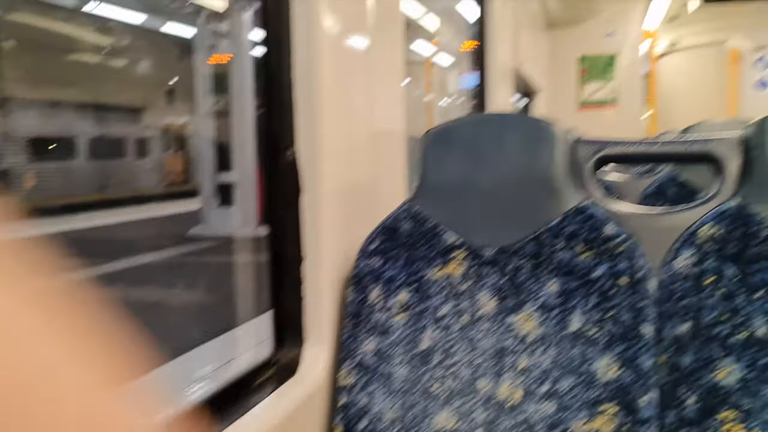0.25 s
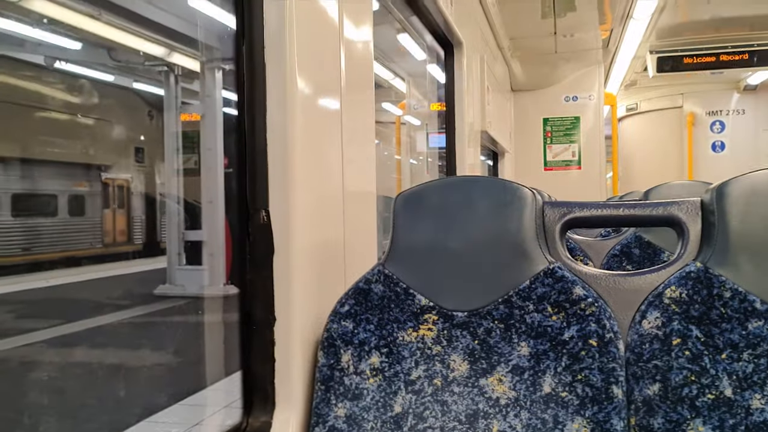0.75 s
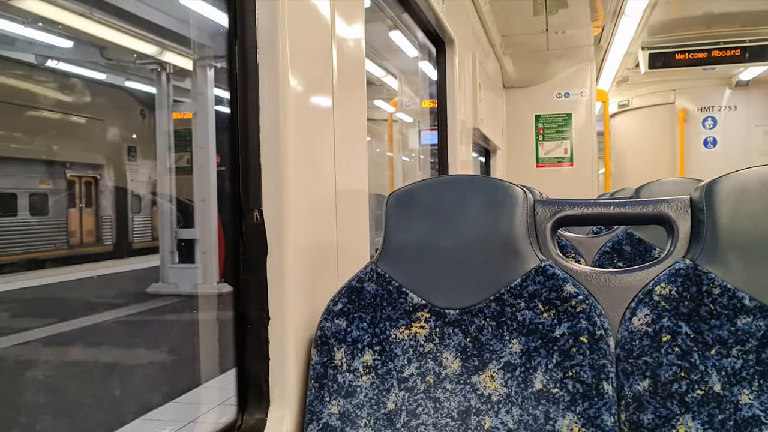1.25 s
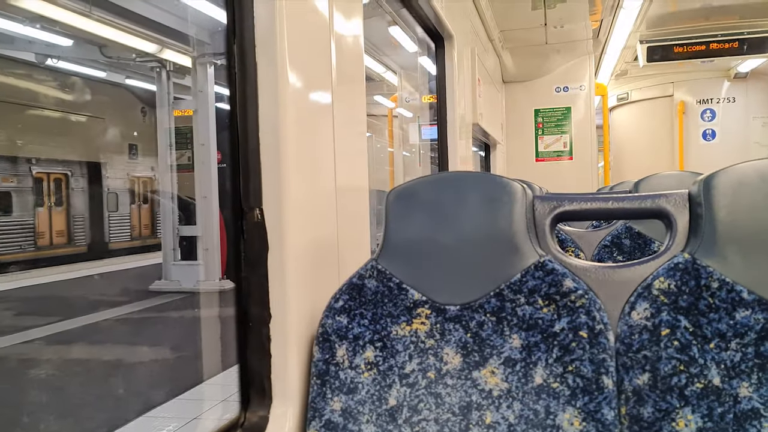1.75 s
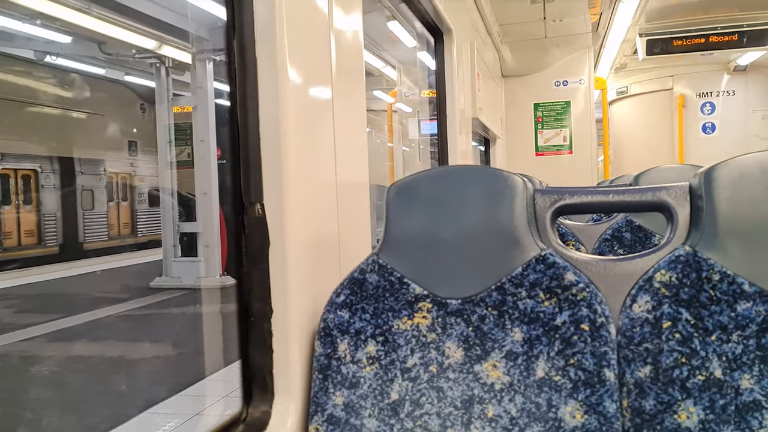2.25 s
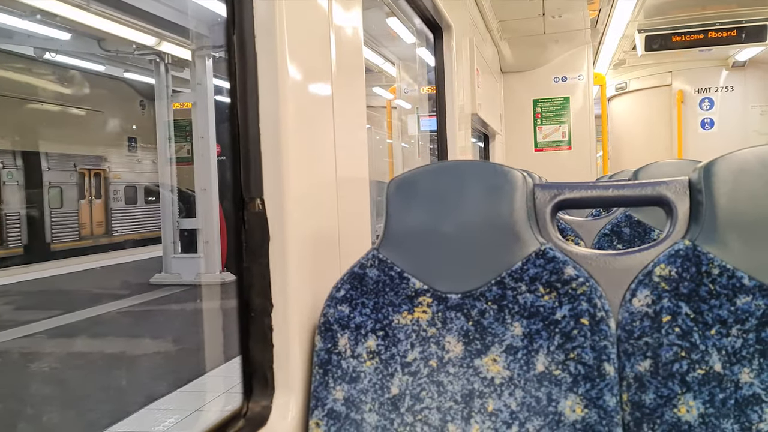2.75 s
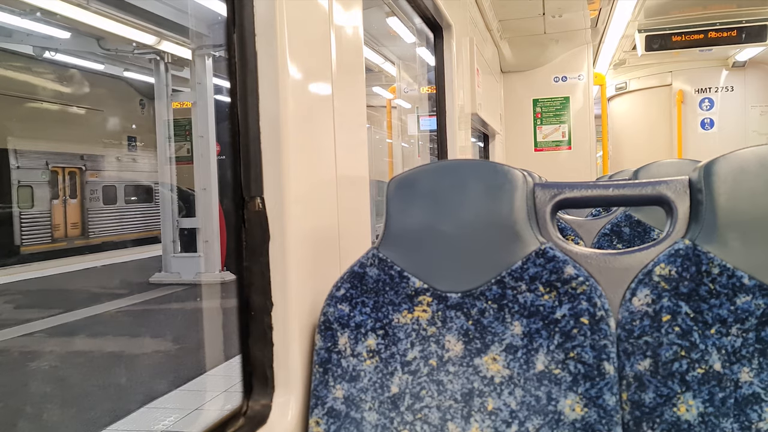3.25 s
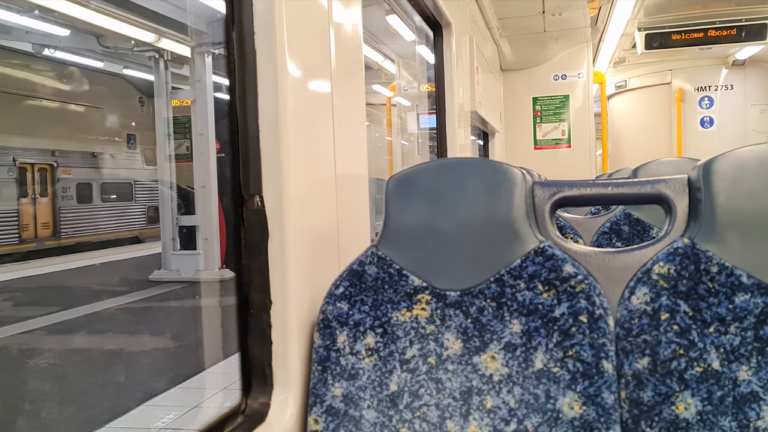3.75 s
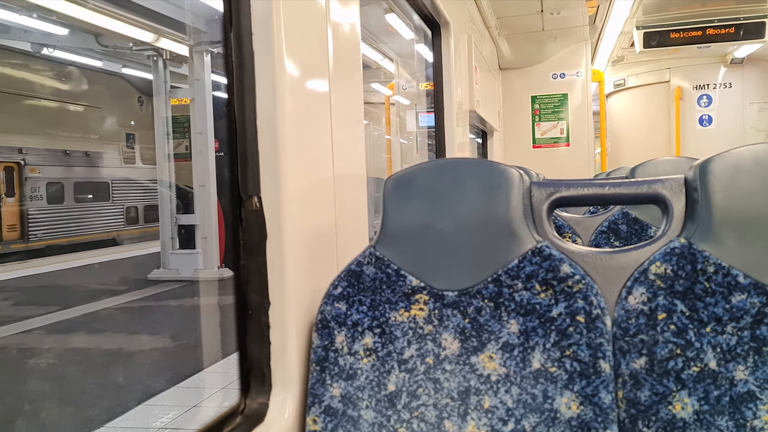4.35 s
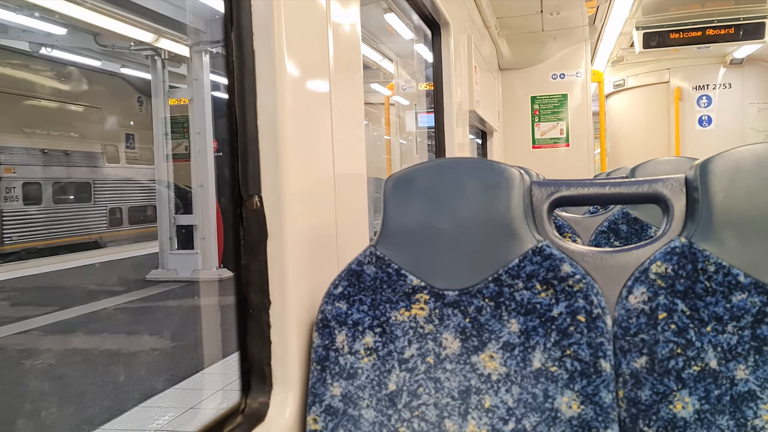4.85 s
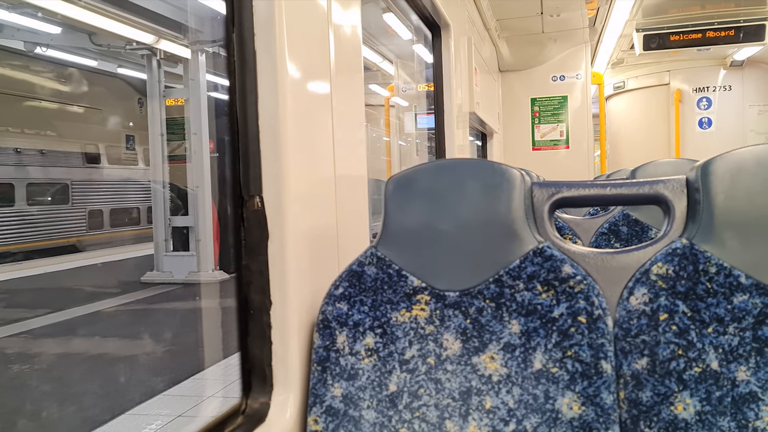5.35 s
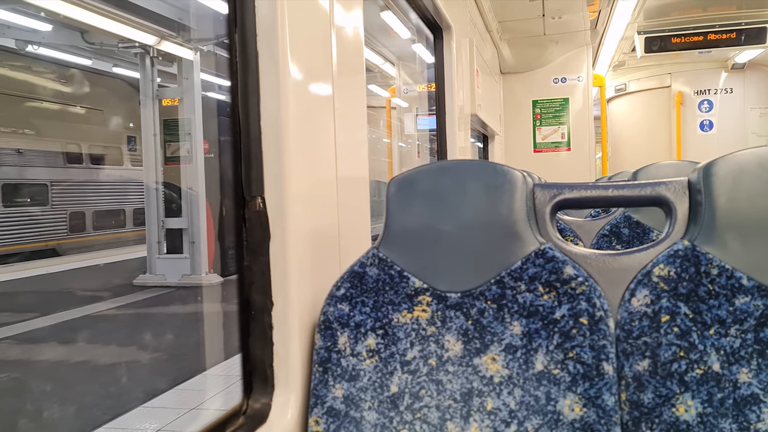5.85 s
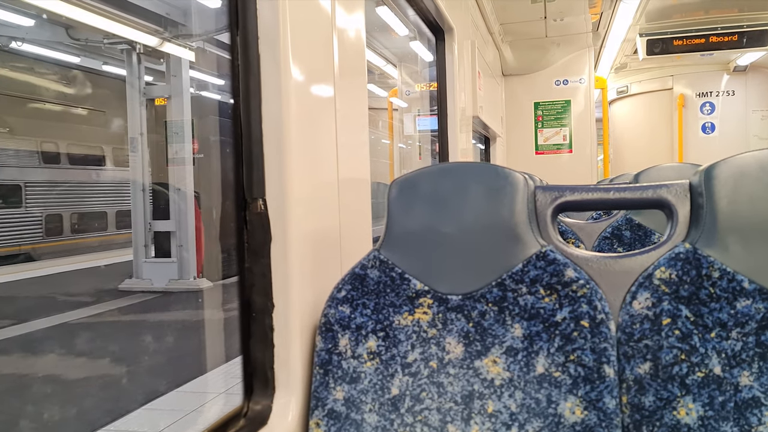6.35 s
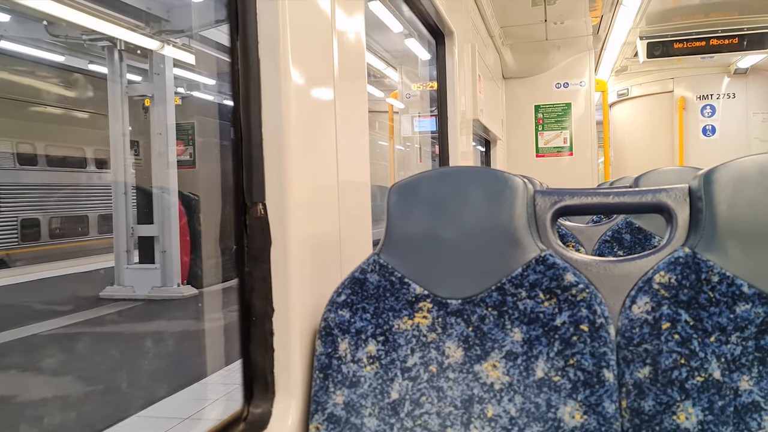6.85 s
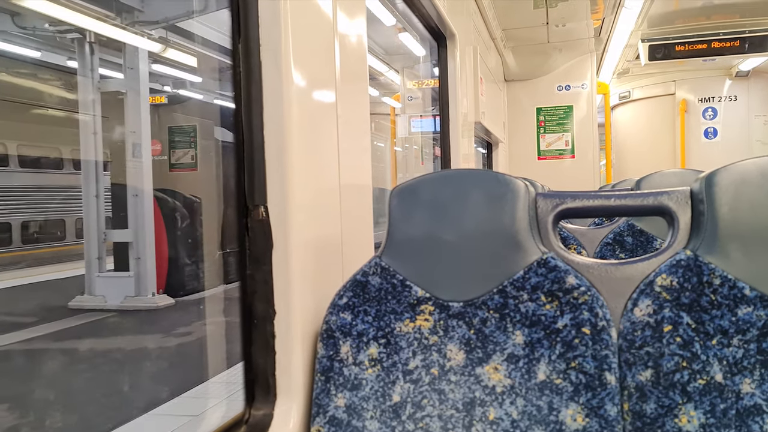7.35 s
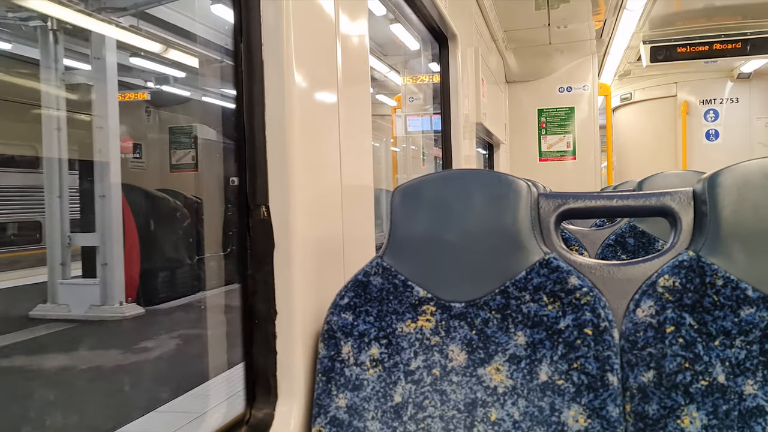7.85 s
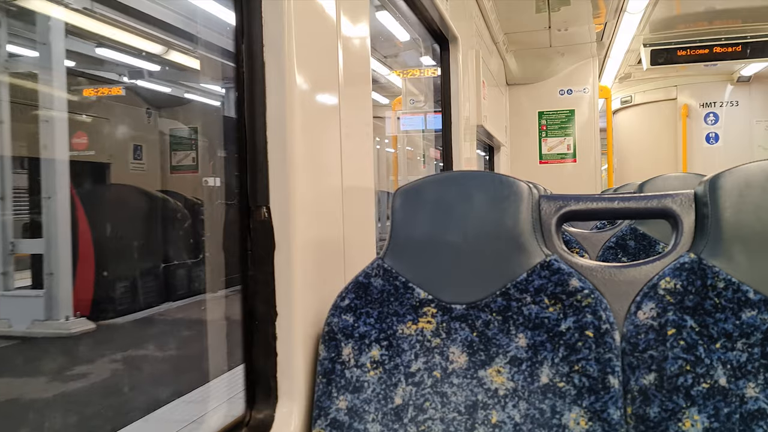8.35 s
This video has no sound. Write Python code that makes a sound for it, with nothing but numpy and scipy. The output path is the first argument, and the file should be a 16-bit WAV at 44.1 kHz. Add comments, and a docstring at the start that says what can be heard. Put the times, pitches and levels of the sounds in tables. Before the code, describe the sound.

Inside a railcar, a diesel lopes at idle while a hand fumbles the phone, then revs to a steady drone, ending with an air puff.

```python
"""A six-cylinder diesel under a railcar's floor lopes at idle, then runs up to a drone as the car leaves a station.
The drone is a stack of waves at multiples of the engine cycle; rattle, gear whine and coloured noise follow it.
The transmission whines as it takes up the drive, a belt chirps at its own rate, and wheels scrub and sing on rails.
Near the start a hand rubs and taps the phone; later the trim creaks, surfaces squeak and an air valve puffs.
Ventilation tones hum throughout. Noise bands shaped by tables make the rumble, clatter, scrubs and puff."""
import sys
import numpy as np
from scipy import signal
from scipy.fft import rfft, irfft
from scipy.io import wavfile
from scipy.ndimage import uniform_filter1d

SR = 44100
rng = np.random.default_rng(int(sys.argv[2]) if len(sys.argv) > 2 else 0)


def persist_wave(psi):
    """Save psi, clipped to +-1, as 16-bit WAV."""
    counts = np.round(np.clip(psi, -1, 1) * 32767).astype(np.int16)
    wavfile.write(sys.argv[1], SR, np.atleast_2d(counts).T)


N = 378378
TIME = np.arange(N) / SR  # seconds


def undb(db):
    """Turns decibels into a gain."""
    return 10 ** (np.asarray(db) / 20)


def ramp(start_s, length_s):
    """Rises evenly from 0 to 1, then holds."""
    return np.clip((TIME - start_s) / length_s, 0, 1)


def bumps(table):
    """Smooth passing rises or dips of a level, in dB."""
    return sum(change_db * np.exp(-((TIME - s) / half_s) ** 2) for s, half_s, change_db in table)


def swell(peak_s, rise_s, t60_s, db):
    """An envelope that swells to its peak, then dies away by 60 dB in t60_s."""
    age = TIME - peak_s
    rising = -(age / rise_s) ** 2
    fading = -np.log(1000) * age / t60_s
    return undb(db) * np.exp(np.where(age < 0, rising, fading))


def walk(rate):
    """A random wavering: a new level every 1 / rate seconds, smoothed twice and scaled to a spread of 1."""
    hold = int(SR / rate)
    steps = np.repeat(rng.standard_normal(N // hold + 2), hold)
    smooth = uniform_filter1d(uniform_filter1d(steps, hold), hold)[:N]
    return smooth / smooth.std()


def tone(cycles, waver_rate):
    """A sustained whine whose level and phase waver at random."""
    level = 1 + .3 * walk(waver_rate + 3)
    return np.sqrt(2) * level * np.cos(2 * np.pi * cycles + .7 * walk(waver_rate))


def line(cycles, waver_rate):
    """A narrow band of noise round a moving pitch; a faster waver makes it wider and rougher."""
    angle = 2 * np.pi * cycles
    return walk(waver_rate) * np.cos(angle) + walk(waver_rate) * np.sin(angle)


def over_bins(points):
    """Spreads a table over all frequencies, joining its points on a log-frequency axis."""
    hz, value = np.transpose(points)
    bin_hz = np.arange(N // 2 + 1) * SR / N
    return np.interp(np.log(bin_hz + 1), np.log(hz), value)


# How alike left and right are. Each row: frequency in Hz, correlation (1 is identical, 0 unrelated).
LIKENESS = [(60, 1), (125, 0.88), (250, 0.5), (500, 0.78), (1000, -0.14), (2000, -0.13), (16000, 0.096)]


def diffuse(spectrum):
    """Coloured noise filling the carriage, scaled to a level of 1: bass alike on both sides, treble mostly not."""
    alike = np.clip(over_bins(LIKENESS), -1, 1)
    noise = rfft(rng.standard_normal((2, N))) * undb(over_bins(spectrum))
    mid, side = noise * np.sqrt([1 + alike, 1 - alike])
    stereo = irfft(np.array([mid + side, mid - side]), N)
    return stereo / stereo.std()


# When the engine starts to run up, and for how long, in seconds
RUN_UP_S, RUN_UP_LENGTH_S = 3.75, 1.3


def engine_speed(idle_hz=42.51, full_hz=62.5):
    """Firings per second: idle, then a run-up that eases into the governed speed."""
    return idle_hz + (full_hz - idle_hz) * np.sin(np.pi / 2 * ramp(RUN_UP_S, RUN_UP_LENGTH_S))


# Brief dips of the boom. Each row: centre in seconds, half length in seconds, change in dB.
BOOM_DIPS = [(4.53, 0.075, -9), (4.76, 0.14, -3), (5.22, 0.098, -10)]


def boom(firing_hz, throttle, floor_hz=55.76, width_hz=10.9, idle_db=-31.5, open_db=-15):
    """The floor's boom grows with the throttle and responds most as the firing rate crosses its resonance."""
    response = 1 / np.hypot(1, 2 * (firing_hz - floor_hz) / width_hz)
    return response * undb(idle_db + (open_db - idle_db) * throttle + bumps(BOOM_DIPS))


# Lines of the drone, idling and under load. Each row: multiple of the engine cycle,
# level in dB relative to the drone's level below. The boom takes the place of row 6.
IDLE_ORDERS = [(1, -42), (2, -39), (3, -31), (4, -23.5), (5, -17.5), (6, -14), (7, -17), (8, -7.5),
               (9, 1.5), (10, -1.8), (11, -10), (12, -10), (13, -14), (14, -23), (15, -18), (16, -20),
               (17, -17), (18, -17), (19, -22), (20, -19), (21, -21), (22, -27), (23, -27), (24, -18),
               (25, -28), (26, -30), (27, -27), (28, -24), (30, -29), (32, -30), (34, -28), (36, -29),
               (38, -26), (40, -28), (42, -29), (44, -30)]
LOAD_ORDERS = [(1, -47), (2, -36), (3, -16), (4, -28), (5, -10), (6, 0), (7, -18), (8, -18), (9, -19),
               (10, -27), (11, -25), (12, -11.5), (13, -26), (14, -17), (15, -26), (16, -24), (17, -31),
               (18, -16), (19, -33), (20, -28), (21, -38), (22, -41), (23, -35), (24, -28), (25, -39),
               (26, -39), (27, -32), (28, -29), (29, -39), (30, -28), (31, -40), (32, -33), (33, -33),
               (34, -36), (35, -38), (36, -33), (37, -37), (38, -35), (39, -38), (40, -37), (41, -39),
               (42, -31), (43, -39), (44, -43)]
# The idle lope slackens or thumps harder. Each row: centre in seconds, half length in seconds, change in dB.
LOPE_CHANGES = [(.38, .06, 2), (.51, .06, -5), (1.22, .08, -5.5), (1.78, .15, -4.5), (2.06, .05, 2),
                (2.52, .22, -3), (2.9, .05, 2), (3.68, .25, -6.5)]


def drone(firing_hz, turn, load, lump=.55, sway_rate=4, firing_sway=0.032, port_phase=0.099):
    """Unequal cylinders give a line at every multiple of the cycle; the sixth is the firing rate."""
    idle_db, load_db = -25.8, -18.7
    idle, loaded = dict(IDLE_ORDERS), dict(LOAD_ORDERS)
    throttle = ramp(3.88, 0.24)  # opens at 3.88 s, over 0.24 s
    fuelling = ramp(RUN_UP_S, .42)  # two firing harmonics build up over 0.42 s
    lope = undb(bumps(LOPE_CHANGES))
    wobble = (1 - load) * .08 + load * .05
    angle = 2 * np.pi * (turn - lump)
    ports = np.array([[port_phase], [-port_phase]])  # standing waves meet the two sides slightly apart
    firing_level = boom(firing_hz, throttle) * (1 + firing_sway * walk(sway_rate))
    out = firing_level * np.cos(6 * angle + ports)
    for k in loaded:
        if k == 6:
            continue
        # these firing harmonics build up sooner; the other lines grow with engine speed
        drive = fuelling if k in (12, 18) else load
        idling = (1 - load) * (lope if 6 < k < 12 else 1)
        idle_part = idling * undb(idle_db + idle.get(k, -np.inf))
        gain = idle_part + drive * undb(load_db + loaded[k])
        # the strong lines near the boom are timed to one point of the cycle; the body scatters the others
        scatter = rng.uniform(0, 2 * np.pi) * (k < 5 or k > 12)
        # the floor rings round its resonance, which draws each idle thump out
        ringing = .4 * (1 - load) * (k - 9.5) ** 2 * (6 < k < 12)
        phase = k * angle + scatter + ringing + wobble * walk(sway_rate)
        out = out + gain * (1 + wobble * walk(sway_rate)) * np.cos(phase + ports)
    return np.sqrt(2) * out


# Colours of the noise: body rumble and clatter, each idling and loaded, and hiss.
# Each row: frequency in Hz, relative strength in dB per Hz.
RUMBLE = [(20, -15.5), (35, -9), (60, 1.5), (78, 3), (105, -11), (135, -11), (200, -15), (260, -13),
          (300, -13.5), (335, -10), (385, -12.5), (430, -18), (560, -18), (800, -31.5), (1500, -75.5)]
RUMBLE_LOADED = [(20, -18), (42, -14), (58, -4), (76, 5.5), (100, -5.5), (135, -4), (190, -16), (260, -17),
                 (340, -13.5), (420, -16.5), (560, -18.5), (800, -29), (1500, -75)]
CLATTER = [(250, -22), (500, -13), (780, 0), (1100, -6.5), (1400, -6), (1750, -6.5), (2100, -14.5),
           (2600, -16.5), (3200, -18.5), (3700, -28), (4500, -35), (7000, -69)]
CLATTER_LOADED = [(250, -22), (480, -15), (660, -4), (790, -1), (930, -3), (1120, -7.5), (1320, -5),
                  (1560, -8.5), (1730, -3.5), (1870, -11.5), (2150, -14.5), (2600, -16), (3100, -16.5),
                  (3700, -27), (4500, -37.5), (7000, -67)]
HISS = [(2000, -15), (3800, -2), (4800, -3.5), (5700, -5), (6800, -22.5), (9000, -15), (11000, -21.5),
        (16000, -35.5)]
# Moments of louder clatter and hiss. Each row: centre in seconds, half length in seconds, rise in dB.
CLATTER_SWELLS = [(3.9, 0.18, 2), (4.75, 0.38, 2.5)]
HISS_SWELLS = [(1.9, 1, 7), (4.85, 0.34, 3), (6.65, 0.2, 5)]


def machinery(turn, load, knock=0.071, flicker_db=0.79):
    """The body rumbles; combustion clatter through the floor pulses at each firing, with a little hiss above."""
    firing = np.cos(2 * np.pi * 6 * turn)
    pulsing = (1 + knock * firing) * undb(flicker_db * walk(18))
    idling, pulling = np.sqrt(1 - load), np.sqrt(load)
    rumble = idling * diffuse(RUMBLE) * undb(-32.5)
    rumble = rumble + pulling * diffuse(RUMBLE_LOADED) * undb(-31.8)
    clatter = idling * diffuse(CLATTER) * undb(-43)
    clatter = clatter + pulling * diffuse(CLATTER_LOADED) * undb(-41.5)
    hiss = diffuse(HISS) * undb(-72 + 4 * load + bumps(HISS_SWELLS))
    return rumble + pulsing * clatter * undb(bumps(CLATTER_SWELLS)) + hiss


def valve_train(turn, load, load_db=-47, idle_db=-50, tilt=1.6, size=4096):
    """Tappets and injectors repeat the same rattle every cycle: a dense comb of faint lines."""
    k = np.arange(size // 2 + 1)  # multiple of the engine cycle
    comb = np.where((k > 44) & (k < 170), np.maximum(k, 1.) ** -tilt, 0)
    cycle = irfft(rfft(rng.standard_normal((2, size))) * comb)
    cycle = cycle / cycle.std()
    place = np.arange(size) / size
    rattle = np.array([np.interp(turn, place, side, period=1) for side in cycle])
    return rattle * (load * undb(load_db) + (1 - load) * undb(idle_db))


# Gear lines. Each row: multiple of the engine cycle, level in dB at full load,
# waver rate in steps per second.
GEARS = [(46, -53, 1.5), (57.9, -57, 3), (70.8, -56.5, 3), (78, -58.5, 2), (81.15, -53, 1.5),
         (98.8, -61, 4), (125.6, -62, 3), (141.2, -65, 3), (156.5, -65, 8), (160.2, -63, 5),
         (164.9, -58.5, 7), (166, -61.5, 6), (168, -61, 14), (240, -70, 5), (281.3, -70, 8),
         (308, -71.5, 3), (324, -77, 5), (343.7, -76, 5)]


def gears(turn, load, idle_share=0.072):
    """Gear lines follow the engine and sing out as it nears full speed."""
    whine = [sum(undb(db) * tone(k * turn, rate) for k, db, rate in GEARS) for _ in range(2)]
    return np.array(whine) * (idle_share + (1 - idle_share) * load ** 4)


# Path of the torque converter's whine. Each row: time in seconds, pitch in Hz, level in dB.
CONVERTER = [(4, 1800, -110), (4.7, 1890, -69), (5.35, 1920, -58.5), (6, 1870, -63), (6.7, 1867, -60.5),
             (7.4, 1874, -68.5), (8.5, 1790, -65)]


def converter(waver_rate=5):
    """The transmission whines as it takes up the drive; its set pitch path climbs, then sinks as slip falls."""
    s, hz, db = np.transpose(CONVERTER)
    cycles = np.cumsum(np.interp(TIME, s, hz)) / SR
    return undb(np.interp(TIME, s, db)) * np.array([tone(cycles, waver_rate) for _ in range(2)])


# The belt slips harder. Each row: centre in seconds, half length in seconds, rise in dB.
BELT_SLIPS = [(.33, 0.42, 23), (4.8, .6, 8.5), (5.55, 0.4, 2.5)]


def belt(sharpness=1.1, slack_waver_rate=300, taut_waver_rate=700, bend_hz=50):
    """An auxiliary belt slips once a turn, chirping upward; pulled taut, it is higher, louder and rougher."""
    slack_hz, taut_hz = 9300, 10120
    slack_db, taut_db = -79.5, -65.5
    slack_rate, taut_rate = 10.47, 10.37  # belt turns per second
    chirp_s = 5.994  # a moment at which it chirps
    taut = ramp(5.12, 0.21)  # pulls taut from 5.12 s, over 0.21 s
    hz = slack_hz + (taut_hz - slack_hz) * taut
    db = slack_db + (taut_db - slack_db) * taut + bumps(BELT_SLIPS)
    turn = np.cumsum(slack_rate + (taut_rate - slack_rate) * taut) / SR
    angle = 2 * np.pi * (turn - np.interp(chirp_s, TIME, turn))
    cycles = np.cumsum(hz + bend_hz * np.sin(angle) + 30 * walk(11)) / SR
    gate = np.exp(sharpness * (np.cos(angle) - 1))

    def squeal():
        return (1 - taut) * line(cycles, slack_waver_rate) + taut * line(cycles, taut_waver_rate)
    return gate * undb(db) * np.array([squeal() for _ in range(2)])


# Wheels singing. Each row: peak in seconds, swell in seconds, fade by 60 dB in seconds, pitch in Hz, level in dB.
SINGING = [(3.88, .1, .6, 3480, -70), (4.6, .12, 1.6, 3205, -60.5), (4.98, .2, 1.1, 3203, -58.5),
           (4.98, .12, 1, 2993, -63), (5.22, .1, .6, 3510, -67), (5.2, .17, 2.4, 2512, -59.5),
           (6.1, .15, 1, 3208, -63)]
# Wheels scrubbing. Each row: peak in seconds, swell in seconds, fade by 60 dB in seconds, level in dB.
SCRUBS = [(3.92, .12, .8, -66), (4.6, .13, .9, -58), (4.96, .06, 1.1, -50), (6.06, .13, 1, -54.5)]
# Colour of the scrub. Each row: frequency in Hz, relative strength in dB per Hz.
SCRUB = [(1500, -22), (2400, -1.5), (3200, 5), (3700, -12.5), (4050, -9), (4600, -20), (7000, -40.5)]


def wheels(waver_rate=7):
    """Wheels scrub on the rails as the car starts to roll, and their modes ring up faintly."""
    def sing():
        return sum(swell(s, rise, t60, db) * tone(hz * TIME, waver_rate) for s, rise, t60, hz, db in SINGING)
    ring = np.array([sing() for _ in range(2)])
    return ring + sum(swell(*row) for row in SCRUBS) * diffuse(SCRUB)


# Rubs on the phone. Each row: peak in seconds, swell in seconds, fade by 60 dB in seconds,
# level of the dull part in dB, level of the bright part in dB (both before the grain and the pan).
RUBS = [(0.012, 0.04, 0.33, -25, -40), (.09, 0.045, 0.23, -41, -62), (.155, 0.041, 0.11, -42, -46.5),
        (.27, 0.029, 0.26, -62, -56), (.385, 0.032, 0.25, -56, -50), (0.432, 0.03, 0.06, -34.5, -45),
        (.572, 0.013, 0.11, -47, -47.5), (0.598, 0.013, 0.018, -58, -46.5)]
# Dull and bright colours of a rub. Each row: frequency in Hz, relative strength in dB per Hz.
RUB_LOW = [(100, 5.5), (400, -1), (850, -2), (1300, -4), (2500, -13.5), (4000, -22.5), (5700, -23),
           (7200, -48)]
RUB_HIGH = [(1000, -6), (3000, 4.5), (5500, -8), (7500, -14), (10000, -12), (16000, -23)]
# Finger taps on the case. Each row: start in seconds, pitch in Hz,
# width in Hz (wider is shorter), peak of the envelope in dB.
TAPS = [(0.253, 4460, 4000, -35), (.282, 4700, 500, -47), (.318, 3000, 2000, -42), (.422, 2700, 1500, -29),
        (.429, 2000, 1900, -26), (.5535, 4000, 3000, -41), (0.5995, 760, 420, -17),
        (0.5995, 2100, 2600, -24.5), (.6645, 2750, 1500, -31.5), (.703, 8000, 7000, -48),
        (1.0445, 2100, 1150, -24)]


def hand(pan_db=-5, bump_s=0.0453, bump_hz=38, bump_db=-12):
    """Skin drags grainily over the case, the grip bumps it, and fingertips tap it."""
    low = sum(swell(s, rise, t60, db) for s, rise, t60, db, _ in RUBS)
    high = sum(swell(s, rise, t60, db) for s, rise, t60, _, db in RUBS)
    skin_grain = undb(2.2 * walk(450))
    rubs = (low * diffuse(RUB_LOW) + high * diffuse(RUB_HIGH)) * skin_grain
    bump = swell(bump_s, 0.024, 0.13, bump_db) * np.cos(2 * np.pi * bump_hz * (TIME - bump_s))
    taps = 0
    for s, hz, width_hz, db in TAPS:
        age = np.maximum(TIME - s, 0)
        push = np.pi * width_hz * age  # a soft fingertip rounds the attack
        taps = taps + undb(db) * push * np.exp(1 - push) * np.sin(2 * np.pi * hz * age)
    pan = undb(np.array([[pan_db], [-pan_db]]) / 2)
    return (rubs + bump) * pan + taps


# Colours of the air jet and of its ring in the carriage.
# Each row: frequency in Hz, relative strength in dB per Hz.
JET_COLOUR = [(500, -9), (2000, -3), (3200, -3.5), (4000, 6), (4650, 6), (5200, -4.5), (6000, -7),
              (6900, -15), (7500, -9.5), (8300, -9.5), (9000, -.5), (9700, -5), (11000, -4.5), (12000, -.5),
              (13000, -4), (16000, -5)]
RING_COLOUR = [(200, -14), (420, -1), (740, 7.5), (1100, 0), (2000, -4.5), (2500, -4), (3200, -8),
               (4000, -1), (4700, -1.5), (5400, -11.5), (6000, -14.5), (6900, -23), (9100, -12),
               (10500, -19), (12200, -18), (13000, -25), (16000, -35)]


def valve(open_s=8.365, pan_db=-2, jet_db=-28.5, jet_t60=0.27, jet_hold_s=0.015, ring_db=-23, ring_t60=0.48):
    """A bright jet of compressed air bursts out and holds an instant; its duller body lingers in the carriage."""
    burst = swell(open_s, 0.0027, jet_t60, jet_db)
    hold = swell(open_s + jet_hold_s, 0.008, jet_t60, jet_db)
    jet = np.maximum(burst, hold) * diffuse(JET_COLOUR)
    ring = swell(open_s + 0.024, 0.027, ring_t60, ring_db) * diffuse(RING_COLOUR)
    return (jet + ring) * undb(np.array([[pan_db], [-pan_db]]) / 2)


# Trim creaks. Each row: peak in seconds, swell in seconds, fade by 60 dB in seconds, level in dB.
CREAKS = [(2.18, .015, 0.34, -55), (2.845, 0.016, 0.43, -47.5), (4.058, 0.005, 0.17, -48),
          (4.114, .005, 0.2, -55), (5.06, .02, .4, -59), (5.092, 0.005, 0.1, -49.5),
          (8.09, 0.022, 0.32, -57), (8.18, .015, 0.23, -56)]
# Colour of a creak. Each row: frequency in Hz, relative strength in dB per Hz.
CREAK = [(1200, -21), (2800, 5), (4500, 1), (5800, -4), (7200, -14), (9500, -11), (12000, -21.5),
         (16000, -24.5)]


def trim(grain_db=1.0):
    """Panels give short gritty creaks that fade in the carriage."""
    return sum(swell(*row) for row in CREAKS) * diffuse(CREAK) * undb(grain_db * walk(250))


# Spells of faint squeaking. Each row: start in seconds, length in seconds, lowest pitch in Hz,
# highest pitch in Hz, squeaks per second, average peak of one squeak in dB before it is shared between the sides.
SQUEAKS = [(4.6, .55, 3750, 4250, 350, -74), (4.58, .55, 4400, 6000, 700, -82),
           (5.18, .3, 8900, 9500, 120, -74), (5.2, .45, 10300, 10700, 120, -73),
           (6.4, .38, 10800, 13400, 110, -79), (6.4, .42, 4000, 6000, 700, -81)]


def squeaks(squeak_s=.04, most_slide=.02):
    """Rubbing surfaces stick and slip in clusters of tiny sliding whistles."""
    out = np.zeros((2, N))
    size = int(squeak_s * SR)
    along = np.linspace(-1, 1, size)
    for s, length, low, high, rate, db in SQUEAKS:
        for when, pitch, slide, strength, side in rng.random((int(rate * length), 5)):
            hz = (low + (high - low) * pitch) * (1 + most_slide * (slide - .5) * along)
            level = undb(db) * 2 * strength
            whistle = level * np.hanning(size) * np.sin(2 * np.pi * np.cumsum(hz) / SR)
            start = int((s + when * length) * SR) - size // 2
            out[:, start:start + size] += np.sqrt([[side], [1 - side]]) * whistle
    return out


# Ventilation tones. Each row: pitch in Hz, level in dB.
FANS = [(246, -54), (312.2, -51), (495.3, -60), (742.9, -55), (990, -54.5), (1190, -67.5), (1976, -73)]


def fans(drift=0.094):
    """Steady fan tones that waver separately at each side."""
    def hum(hz, db):
        level = undb(db) * (1 + .17 * walk(3.5))
        return np.sqrt(2) * level * np.cos(2 * np.pi * hz * TIME + drift * walk(2.9))
    return np.array([sum(hum(hz, db) for hz, db in FANS) for _ in range(2)])


def scene():
    """Engine speed sets the cycle and the load, which drive the engine and gears; the rest keeps its own time."""
    firing_hz = engine_speed()
    turn = np.cumsum(firing_hz) / SR / 6  # engine cycles so far, six firings in each
    load = np.clip((firing_hz - 43) / 16.4, 0, 1)
    engine = drone(firing_hz, turn, load) + machinery(turn, load) + valve_train(turn, load)
    drive = gears(turn, load) + converter() + belt()
    passing = wheels() + hand() + valve() + trim() + squeaks()
    return engine + drive + passing + fans()


def record(dry):
    """The phone cuts the treble off steeply above 15800 Hz."""
    return signal.sosfilt(signal.ellip(10, .2, 80, 15800, fs=SR, output="sos"), dry)


dry = scene()
out = record(dry)
persist_wave(out)
```